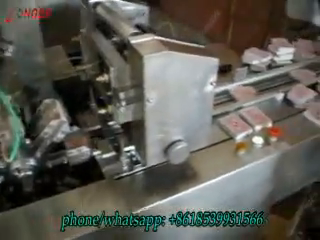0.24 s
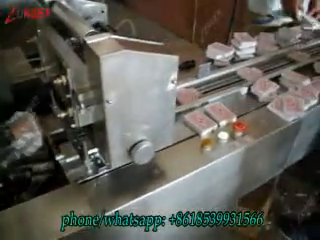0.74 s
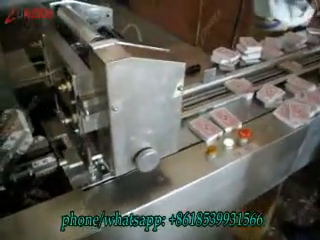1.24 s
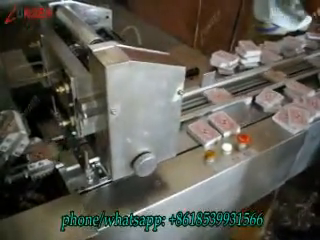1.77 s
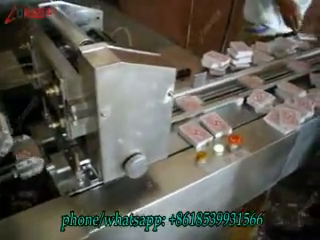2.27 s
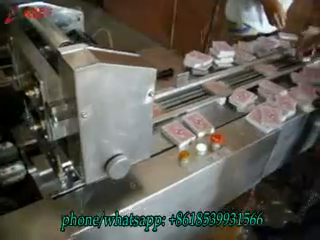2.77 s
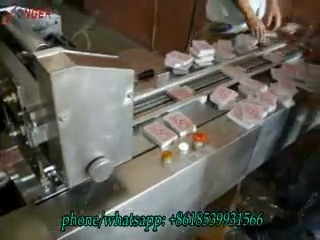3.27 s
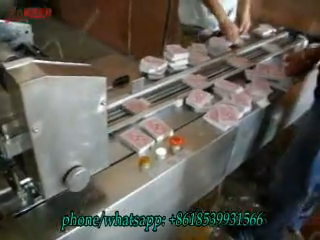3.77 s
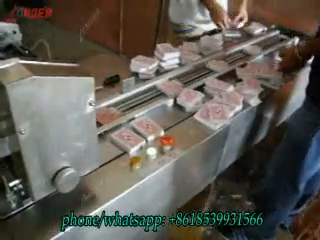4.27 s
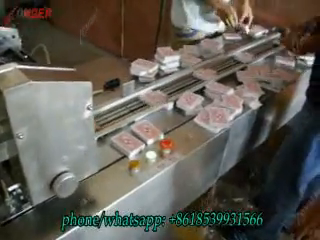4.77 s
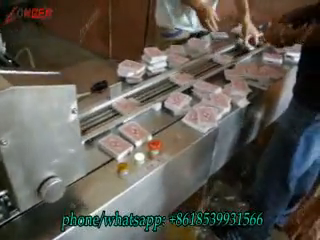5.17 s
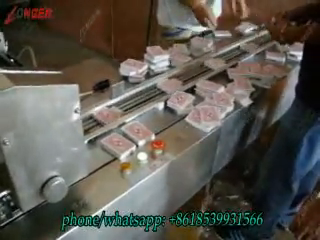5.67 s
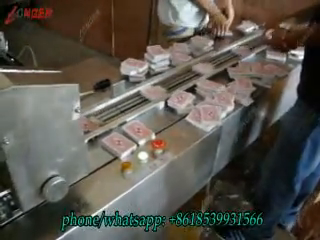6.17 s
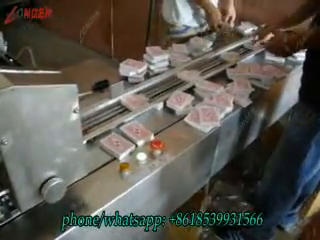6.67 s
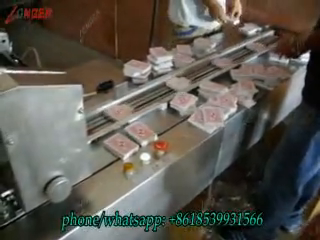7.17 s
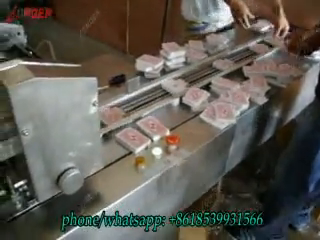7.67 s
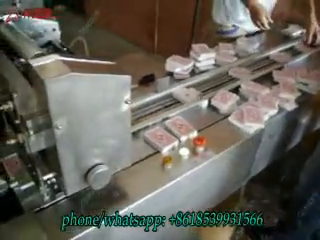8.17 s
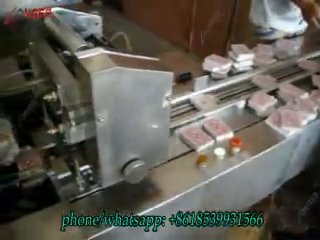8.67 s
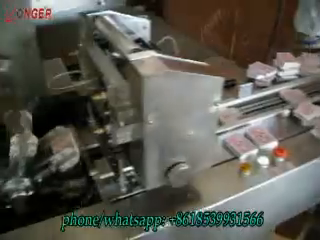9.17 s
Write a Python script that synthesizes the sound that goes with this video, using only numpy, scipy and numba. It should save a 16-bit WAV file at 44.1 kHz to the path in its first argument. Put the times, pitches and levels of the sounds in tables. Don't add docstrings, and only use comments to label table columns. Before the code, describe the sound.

A wrapping machine drones in an echoing workshop, ringing a metallic clack every 1.7 seconds amid ticks, with heavy table knocks joining later.

```python
import sys
import numpy as np
from scipy import signal
from scipy.io import wavfile
from scipy.ndimage import uniform_filter1d
from numba import njit

SR = 44100
rng = np.random.default_rng(int(sys.argv[2]) if len(sys.argv) > 2 else 0)


def to_linear_factor(level_db):
    exponent = np.asarray(level_db, float) / 20
    return 10 ** exponent


def pcm_store(signal):
    levels = np.round(np.clip(np.atleast_2d(signal), -1, 1) * 32767)
    wavfile.write(sys.argv[1], SR, levels.astype(np.int16).T)


N = 416295


def read(table, hz):
    f, v = np.transpose(table)
    return np.interp(np.log(hz), np.log(f), v)


def band(lo_hz, hi_hz, size=N):
    sos = signal.butter(2, [lo_hz, min(hi_hz, .45 * SR)], "bandpass", fs=SR, output="sos")
    x = signal.sosfilt(sos, rng.standard_normal(size))
    return x / x.std()


def walk(rate_hz):
    hold = int(SR / rate_hz)
    steps = np.repeat(rng.standard_normal(N // hold + 1), hold)
    return 1.1 * uniform_filter1d(uniform_filter1d(steps, hold), hold)[:N]


def chatter(rate_hz, spread_db):
    hits = (rng.random(N) < rate_hz / SR) * to_linear_factor(spread_db * rng.exponential(size=N))
    x = signal.lfilter([1], [1, -np.exp(-1 / (0.016 * SR))], hits) + 0.12
    return x / np.sqrt(np.mean(x ** 2))


def peak_db(s, db, rise_db_s, fall_db_s):
    t = np.arange(N) / SR - s
    return db + np.minimum(rise_db_s * t, -fall_db_s * t)


def gate(start, end):
    t = np.arange(N) / SR
    return np.clip(np.minimum(t - start, end - t) / .01, 0, 1)


def cluster(lo_hz, hi_hz, count):
    place = (np.arange(count) + rng.random(count)) / count
    return lo_hz * (hi_hz / lo_hz) ** place


@njit
def add(out, start, hz, gain, t60, phase, rise):
    soft = np.exp(-1 / (rise * SR))
    for k in range(len(hz)):
        turn = np.exp(2j * np.pi * hz[k] / SR - np.log(1000) / (t60[k] * SR))
        z, wait = gain[k] * np.exp(1j * phase[k]), 1.
        for i in range(start, min(len(out), start + int(t60[k] * SR))):
            wait *= soft
            out[i] += z.imag * (1 - wait)
            z *= turn


def strike(out, s, hz, db, t60, rise, scatter=3.):
    chance = rng.standard_normal((4, len(hz)))
    detuned = hz * (1 + .003 * chance[0])
    gain = to_linear_factor(db + 1.5 * chance[1])
    add(out, int(s * SR), detuned, gain, t60 * np.exp(0.14 * chance[3]), scatter * chance[2], rise)


# (time [s], nearness [dB])
NEARNESS = [(0, 2), (.4, 0.25), (1.599, -0.5), (2.4, 1.3), (3.2, -0.2), (3.7, 3), (4.7, -1.1), (5.5, 1.6),
            (6.199, -0.6), (7.299, 1), (8.1, -0.7), (8.7, 0.5), (9.44, 0.7)]
# (frequency [Hz], level per Hz [dB])
DRONE_TONE = [(11, -30), (20, 4), (31, -5), (100, -9.5), (117, -5), (214, -7.5), (246, -18.5), (270, -4.5),
              (333, -12), (429, -6), (500, -12), (660, -15), (830, -7.5), (1530, -26), (2380, -20.5),
              (3610, -28.5), (4550, -48.5), (5920, -70), (10000, -120)]


def drone():
    mid = np.interp(np.arange(N) / SR, *np.transpose(NEARNESS))
    bass, treble = mid, 1.1 * mid
    out, swell, grain = 0, walk(2.7), chatter(60, 0.87)
    for hz in 22 * 2 ** (np.arange(24) / 3):
        db = read(DRONE_TONE, hz) + 10 * np.log10(hz) + 0.44 * swell + 0.8 * walk(13)
        x = band(hz / 2 ** (1 / 6), hz * 2 ** (1 / 6))
        if hz > 1600:
            x = x * (0.64 + 0.21 * grain)
            db = db + treble
        else:
            db = db + (bass if hz < 550 else mid)
        out = out + to_linear_factor(db) * x
    return to_linear_factor(-25.5) * out / out.std()


# (centre [Hz], top [dB], body near 1 kHz [dB], frame [dB])
LEVER, GRIP = (3549.5, -7.5, -0.4, -5.5), (2399, -7.5, -8.5, -15)
SNAP, LATCH = (2480, -16, -11.5, -6), (2651, -11.5, -6, -11)
# (time [s], peak [dB])
LEVER_CLICKS = [
    (0.0685, -16),
    (1.757, -25.5),
    (3.4531, -20),
    (5.1433, -15),
    (6.8315, -18),
    (8.5209, -14.5),
]
GRIP_CLICKS = [
    (.516, -12.5),
    (2.2085, -15.5),
    (3.874, -20.5),
    (5.581, -17.5),
    (7.2753, -17.5),
    (8.971, -13.5),
]
SNAP_CLICKS = [
    (0.5789, -12.5),
    (2.2553, -8.5),
    (3.9477, -10),
    (5.6308, -10.5),
    (7.3229, -10),
    (9.0235, -12.5),
]
LATCH_CLICKS = [
    (1.1172, -16),
    (2.804, -16.5),
    (4.5039, -15.5),
    (6.2043, -17.5),
    (7.8992, -18),
]
# (time [s], peak [dB])
RAIL_TAPS = [(.3311, -38.5), (.8699, -31), (1.0285, -31.5), (1.608, -29.5), (2.185, -27), (2.293, -14),
             (3.9252, -19.5), (5.4985, -22), (6.0541, -25), (7.1706, -23.5), (7.246, -26.5), (8.94, -35),
             (9.0493, -22.5)]
# (centre [Hz], top [dB], body [dB], frame [dB])
RAIL = (2201, -11, -3.2, -8)
# (time [s], peak [dB], centre [Hz])
CHAIN_LINKS = [(1.2895, -23.5, 2790), (1.434, -25.5, 3830), (1.487, -21.5, 3950), (1.6694, -25, 3600),
               (1.8445, -26, 2860), (2.2404, -16.5, 2730), (2.5307, -16.5, 2840), (2.5468, -20, 2370),
               (2.74, -21, 2860), (3.1896, -19, 3720), (3.278, -23.5, 3840), (3.297, -24, 3780),
               (4.8397, -21.5, 2450), (5.3487, -20, 2830), (6.3566, -24, 3690), (6.5715, -23, 2400),
               (7.3542, -13, 2270), (7.6881, -23, 2980), (7.7728, -19.5, 2340), (8.085, -20.5, 2740),
               (8.3824, -23, 3500), (8.2666, -16.5, 3700), (8.268, -20, 4350), (8.358, -20.5, 3640),
               (8.4325, -19.5, 3630), (9.247, -17, 2340)]
# (top [dB], body [dB], frame [dB])
LINK_COLOUR = (-8, -9, -17)
# (frequency [Hz], level [dB])
PANEL_TONE = [(600, -11), (850, -4.5), (1080, 3.5), (1250, -6.5), (1500, -17), (1900, -21.5)]


def ticks():
    out = np.zeros(N)
    parts = ((LEVER, LEVER_CLICKS), (GRIP, GRIP_CLICKS), (SNAP, SNAP_CLICKS), (LATCH, LATCH_CLICKS),
             (RAIL, RAIL_TAPS))
    clicks = [row + colour for colour, rows in parts for row in rows]
    clicks += [row + LINK_COLOUR for row in CHAIN_LINKS]
    for s, db, centre_hz, top_db, body_db, frame_db in clicks:
        start = s - .0015
        strike(out, start, cluster(.89 * centre_hz, 1.11 * centre_hz, count=6), db - 15.0, 0.057, 0.00026)
        rebound_s = 0.009 + .004 * rng.standard_normal()
        for lag, rebound_db in ((0, 0), (rebound_s, -5.)):
            edge_db = db + rebound_db
            strike(out, start + lag, cluster(1800, 3200, count=20), edge_db - 21.5, 0.019, 0.0016)
            strike(out, start + lag, cluster(3000, 4600, count=14), edge_db + top_db - 10.0, 0.03, 0.0039)
        hz = cluster(550, 1900, count=20)
        strike(out, start, hz, db + body_db + .5 * read(PANEL_TONE, hz) - 9.5, 0.13, 0.0027)
        strike(out, start, cluster(240, 520, count=6), db + frame_db - 6.5, 0.2, 0.023)
    return out


# (loudest time [s], rattle [dB], frame [dB])
JAW_SLIDES = [
    (.54, -27, -18),
    (2.25, -35, -17),
    (3.946, -31, -19.5),
    (5.632, -31, -19.5),
    (7.33, -32, -19.5),
    (9.025, -23.5, -17),
]
# (frequency [Hz], level [dB])
SLIDE_TONE = [(150, -8), (250, -14), (400, 0.8), (600, -20), (1000, -1.2), (1500, -29)]


def jaws():
    rattle, frame = 0, 0
    for (s, db, frame_db), clack in zip(JAW_SLIDES, CAM_CLACKS):
        span = gate(clack[0] - .19, clack[0])
        rattle = rattle + span * to_linear_factor(peak_db(s, db, rise_db_s=219.5, fall_db_s=172.5))
        frame = frame + span * to_linear_factor(peak_db(s, frame_db, rise_db_s=61.5, fall_db_s=60.5))
    for s, db in GRIP_CLICKS + SNAP_CLICKS:
        rattle = rattle + to_linear_factor(peak_db(s, db - 11, rise_db_s=3000, fall_db_s=379))
    shake = 0
    for hz in (140, 190, 278, 373, 520, 600, 895, 1070, 1440):
        shake = shake + to_linear_factor(read(SLIDE_TONE, hz)) * band(hz / 1.15, hz * 1.15)
    bright = band(2050, 3200) + to_linear_factor(-11.5) * band(3100, 4200)
    return to_linear_factor(-6.5) * rattle * chatter(130, 1.2) * bright + to_linear_factor(-8.5) * frame * shake


# (time [s], peak [dB], frame [dB], crack [dB])
CAM_CLACKS = [
    (0.679, -3.5, -6.5, -19),
    (2.364, -2.5, -6, -16.5),
    (4.048, -3, -7.5, -20),
    (5.7371, -4.5, -5.5, -16.5),
    (7.433, -3.5, -14, -21),
    (9.1327, -3.5, -12.5, -18.5),
]
# (frequency [Hz], level [dB], t60 [s])
ARM_MODES = [(1109, 2.3, 0.22), (1117, -5.5, 0.24), (1141, -7.5, 0.33), (1070, -6, 0.17), (950, -12, 0.22),
             (1040, -6.5, 0.18), (894, -15, 0.12), (1420, -21.5, 0.3), (2220, -22.5, .15)]
# (frequency [Hz], level [dB], t60 [s])
FRAME_MODES = [(329.5, -6.5, 0.37), (347, -13.5, 0.8), (436.8, -2.5, 0.19), (403, -4.5, 0.067)]


def clacks():
    out = np.zeros(N)
    arm_hz, arm_db, arm_t60 = np.transpose(ARM_MODES)
    frame_hz, mode_db, frame_t60 = np.transpose(FRAME_MODES)
    for s, db, frame_db, crack_db in CAM_CLACKS:
        start = s - .002
        strike(out, start, arm_hz, db + arm_db - 11.0, arm_t60, 0.0012, scatter=.4)
        strike(out, start, cluster(850, 1300, count=8), db - 20.0, 0.055, 0.0011)
        strike(out, s + .003, frame_hz, db + frame_db + mode_db + 0.5, frame_t60, 0.0042)
        strike(out, start, cluster(1400, 4500, count=70), db + crack_db - 14.5, 0.12, 0.0017)
    return out


# (time [s], blow [dB], panel ring [dB], edge [dB], decay t60 [s])
TABLE_KNOCKS = [
    (3.590, 4.5, -6.5, -10, .28),
    (5.256, 3.5, -11.5, -15.5, 0.2),
    (6.959, -0.1, -20.5, -21.5, 0.17),
    (8.657, -2.3, -11, -19.5, 0.1),
    (3.641, -10, -3, -9, 0.18),
    (5.312, -6, -12, -29, .26),
    (5.499, -15.5, -0.7, -15.5, .12),
    (7.172, -12.5, -7, -17.5, 0.089),
    (1.010, -17, -21.5, -24, .19),
    (3.290, -23.5, -22, -23, .33),
]
# (frequency [Hz], level [dB])
TABLE_TONE = [(35, -48), (60, -40), (216, -11.5), (242, -6), (351, 2), (472, -17.5), (517, -7), (726, -24),
              (900, -24), (1170, -51), (1980, -120)]
# (frequency [Hz], level [dB], t60 [s])
TABLE_RINGS = [(75, -17.5, .35), (109.4, -14.5, 0.24), (219, -9, .2), (266.5, 6, .1), (311.7, -0.5, .22),
               (355, -2.5, 0.33), (432.3, -13, .25), (551, -12, 0.16)]


def knocks():
    out = np.zeros(N)
    ring_hz, ring_db, ring_t60 = np.transpose(TABLE_RINGS)
    for s, db, panel_db, edge_db, t60 in TABLE_KNOCKS:
        hz = cluster(89.93, 849.2, count=30)
        strike(out, s, hz, db + read(TABLE_TONE, hz) + 10 * np.log10(hz / 320) - 13.5, t60, 0.00019)
        strike(out, s + .001, ring_hz, db + ring_db - 9.5, ring_t60 * np.sqrt(t60 / .2), 0.0026, scatter=1.2)
        hz = cluster(120, 2200, count=40)
        thud_db = db - 4.5 - 9.5 - 5.4 * np.abs(np.log2(hz / 280))
        strike(out, s - .0007, hz, thud_db, 0.074 * (hz / 300) ** -.25, 0.00046)
        hz = cluster(600, 1900, count=48)
        strike(out, s, hz, db + panel_db + read(PANEL_TONE, hz) - 15.0, 0.35 * (hz / 1000) ** -.8, 0.0019)
        hz = cluster(1400, 4500, count=60)
        bright_db = db + edge_db - 20.0 - 1.0 * np.log2(hz / 2500)
        strike(out, s + .002, hz, bright_db, 0.1 * (hz / 2500) ** -.6, 0.0025)
    return out


# (first shake [dB], fall [dB/s], second lurch after [s], lurch [dB])
TABLE_SHAKES = [
    (-8, 90.5, .218, -18),
    (-3.5, 121, 0.23, -15.5),
    (-10, 86, .218, -29),
    (-7, 192.5, .16, -22.5),
]


def shudder():
    body = 0
    for hz in cluster(170, 540, count=12):
        body = body + to_linear_factor(read(TABLE_TONE, hz)) * np.sqrt(hz) * band(hz / 1.04, hz * 1.04)
    body = body / np.sqrt(uniform_filter1d(body ** 2, 800) + 0.069 * body.var())
    drive = 0
    for (s, *_), (db, fall_db_s, after, lurch_db) in zip(TABLE_KNOCKS, TABLE_SHAKES):
        shake = to_linear_factor(peak_db(s + .006, db, 500, fall_db_s))
        lurch = to_linear_factor(peak_db(s + after, lurch_db, rise_db_s=402, fall_db_s=161))
        drive = drive + gate(s - .005, s + .34) * (shake + lurch)
    return to_linear_factor(-2.) * body * drive


# (frequency [Hz], t60 [s])
ROOM_DECAY = [(100, 1.2), (400, 1.0), (1200, .5), (3000, .4)]


def room(x):
    t = np.arange(SR) / SR
    tail = 0
    for hz in 90 * 2. ** np.arange(6):
        noise = band(hz / np.sqrt(2), hz * np.sqrt(2), size=SR) * np.sqrt(hz)
        tail = tail + noise * to_linear_factor(-60 * t / read(ROOM_DECAY, hz))
    tail *= np.clip(t / .012, 0, 1)
    return signal.fftconvolve(x, tail / np.sqrt(np.sum(tail ** 2)))[:N]


def scene():
    cam = clacks()
    parts = knocks() + ticks() + jaws()
    echo = to_linear_factor(-12.5) * room(parts + .5 * cam)
    return (cam + parts + shudder() + echo + drone())[None]


def low_pass(x):
    return signal.sosfilt(signal.butter(12, 15700, fs=SR, output="sos"), x)


def record(dry):
    x = np.clip(dry, -.8, .8)
    overload = np.abs(dry) > .8
    sag = signal.lfilter([1 / (0.14 * SR)], [1, 1 / (0.044 * SR) - 1], overload)
    x = signal.sosfilt(signal.butter(3, 3900, fs=SR, output="sos"), x)
    x = signal.sosfilt(signal.ellip(10, .5, 90, 4720, fs=SR, output="sos"), x)
    x = x - 0.75 * np.sign(x) * np.maximum(np.abs(x) - .71, 0)
    x = signal.sosfilt(signal.butter(3, 10500, fs=SR, output="sos"), x) * (1 - 0.11 * sag)
    hiss = to_linear_factor(-100.) * rng.standard_normal(x.shape)
    return low_pass(x + hiss + .006)


dry = scene()
out = record(dry)
pcm_store(out)
```